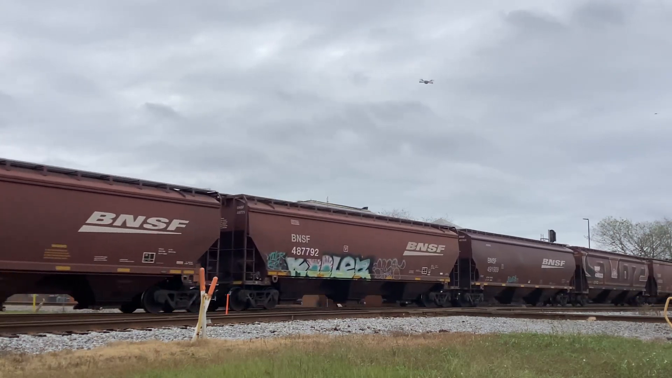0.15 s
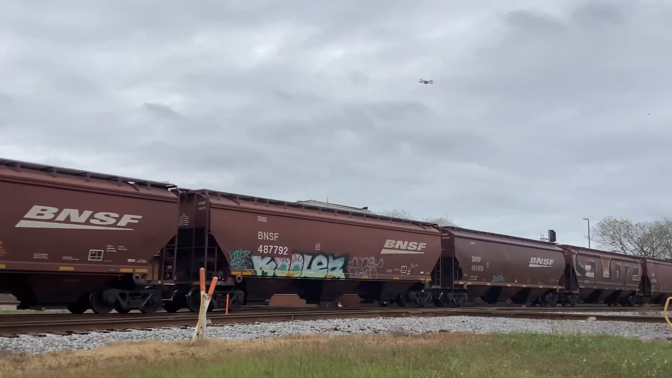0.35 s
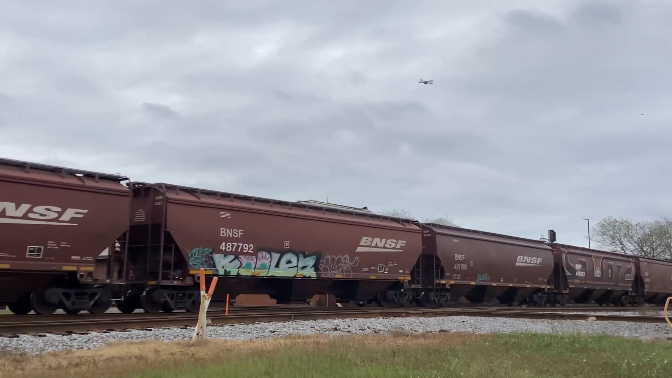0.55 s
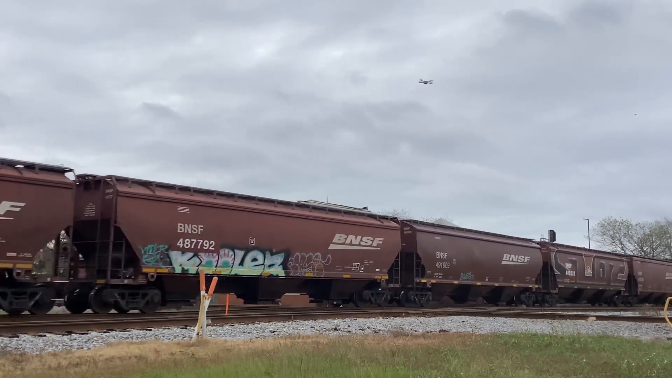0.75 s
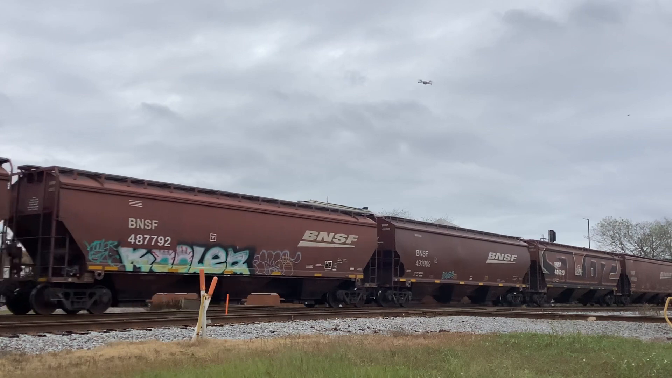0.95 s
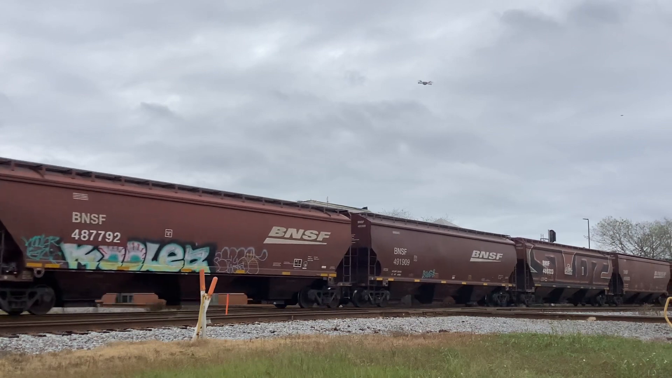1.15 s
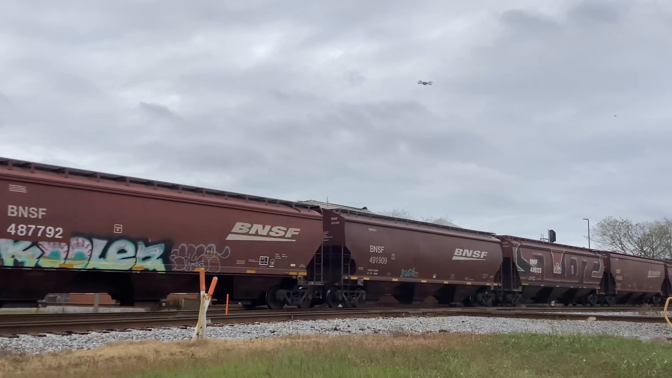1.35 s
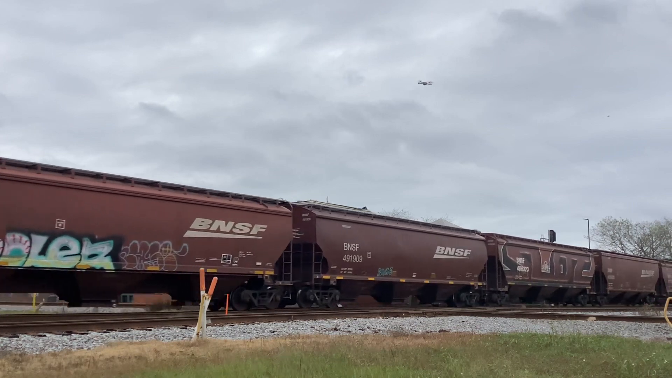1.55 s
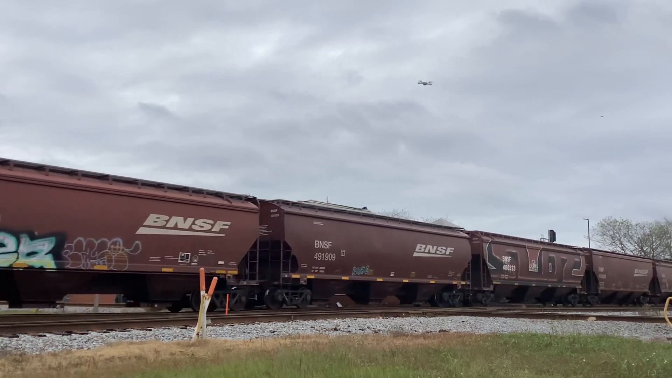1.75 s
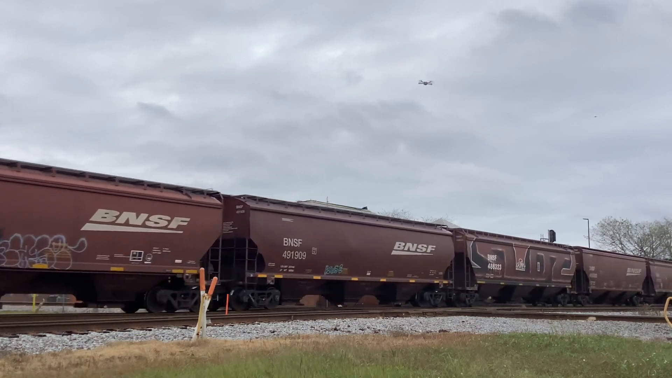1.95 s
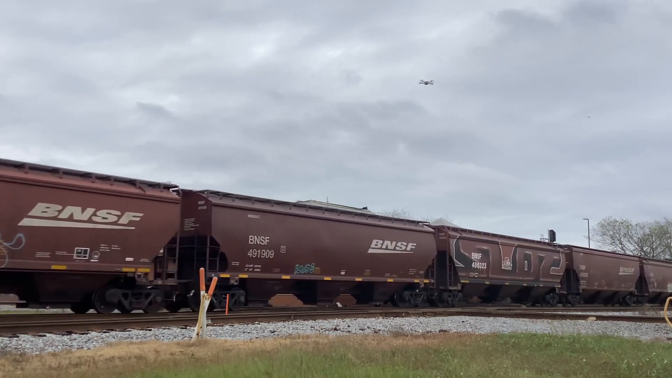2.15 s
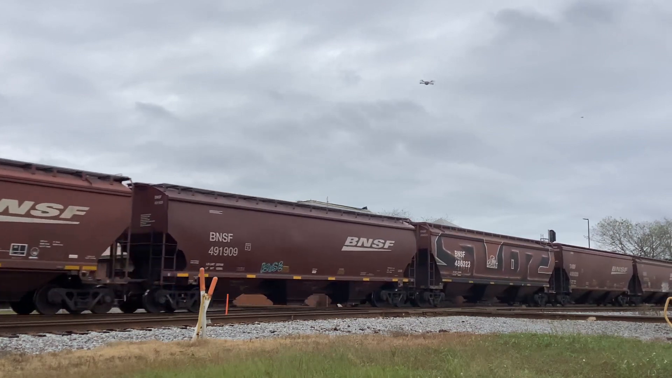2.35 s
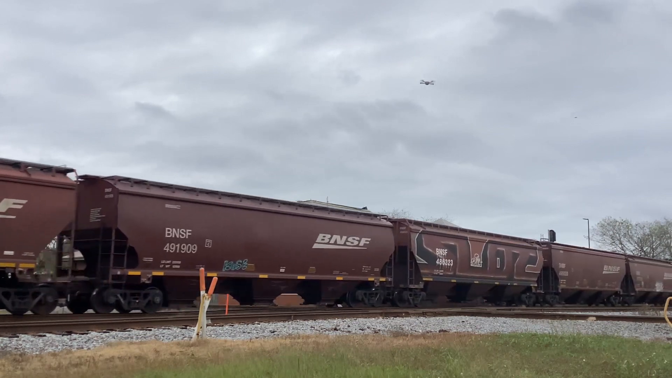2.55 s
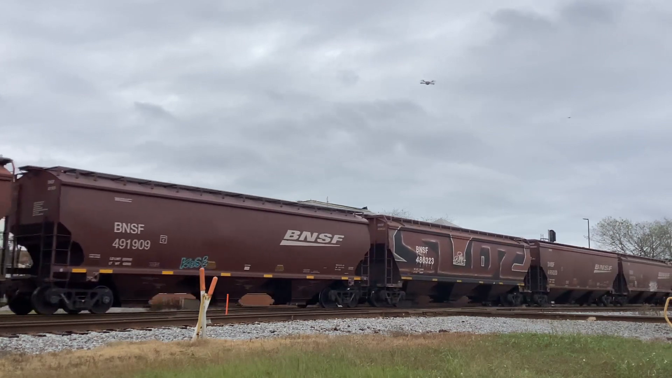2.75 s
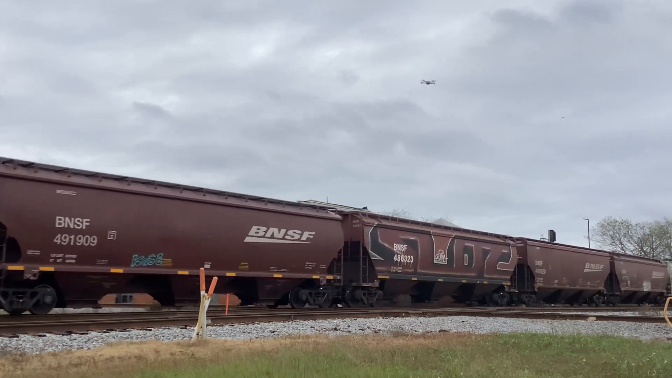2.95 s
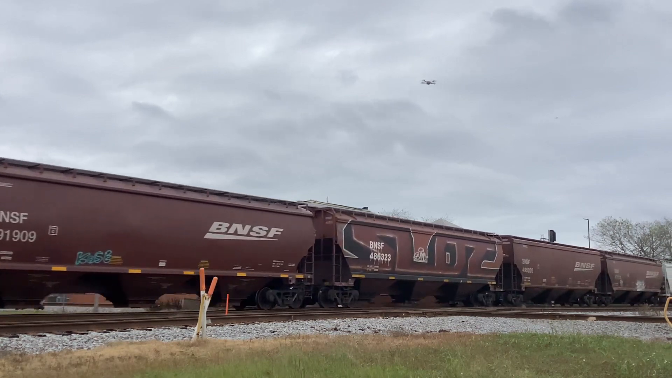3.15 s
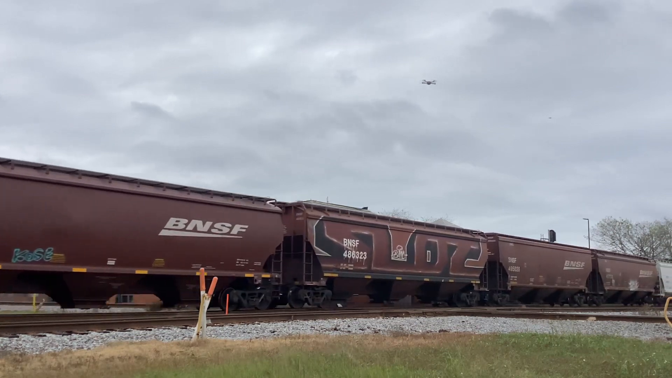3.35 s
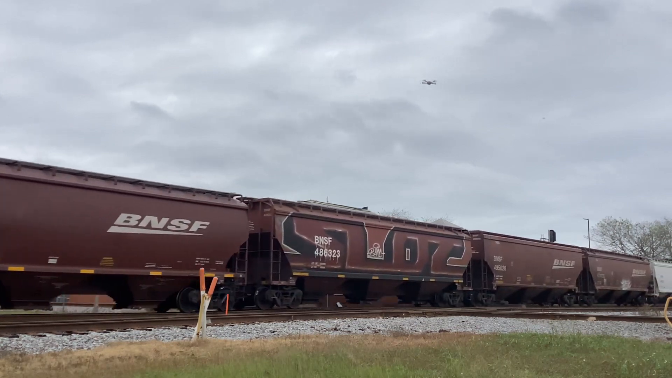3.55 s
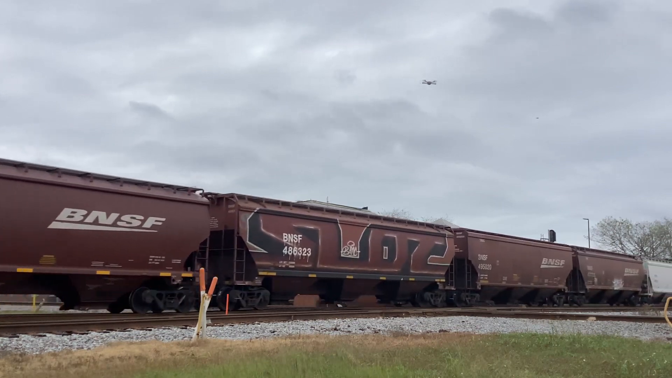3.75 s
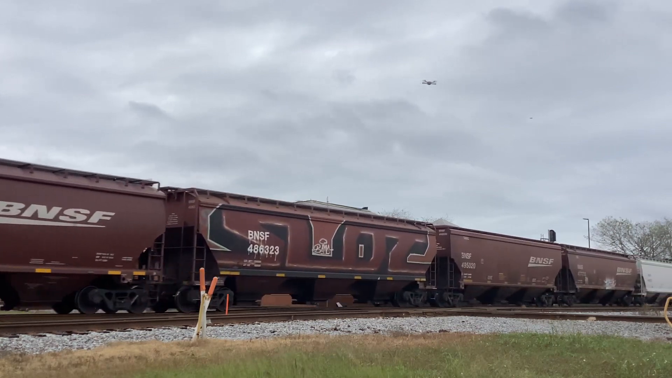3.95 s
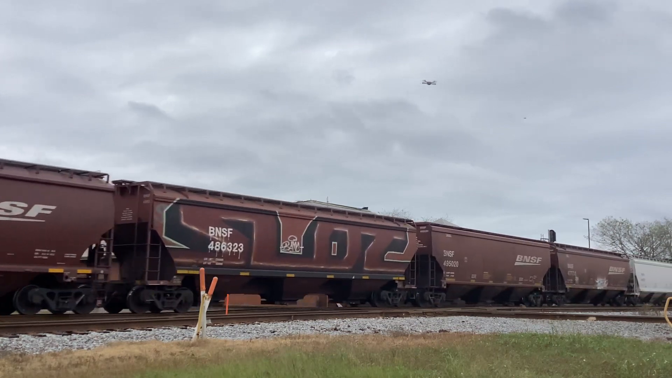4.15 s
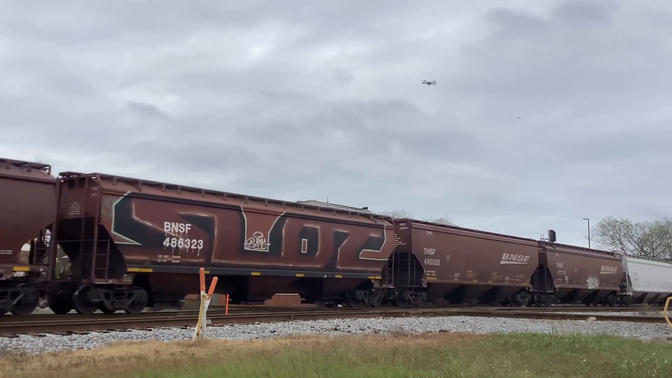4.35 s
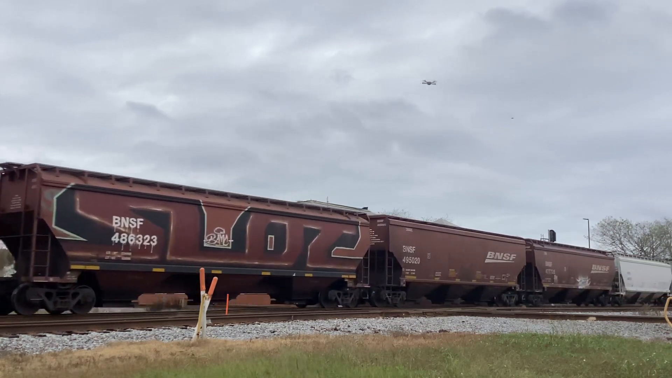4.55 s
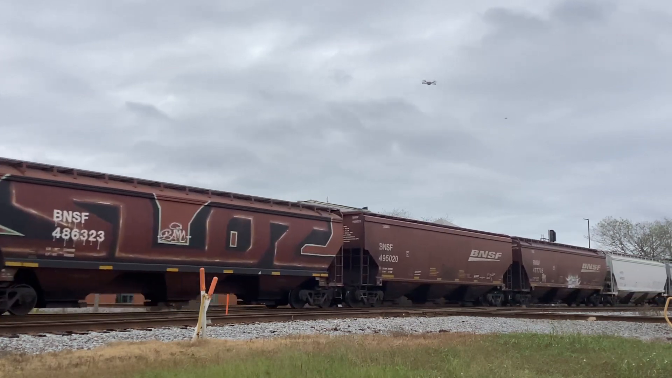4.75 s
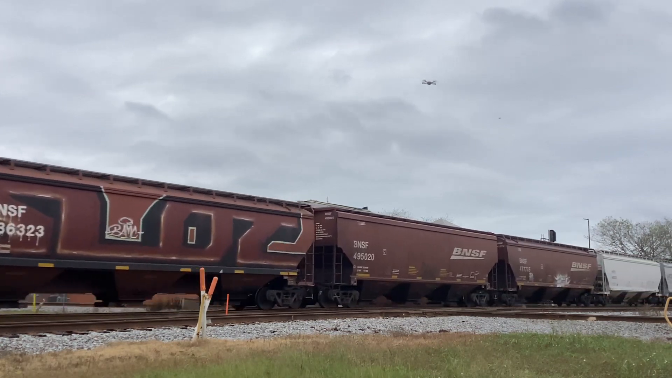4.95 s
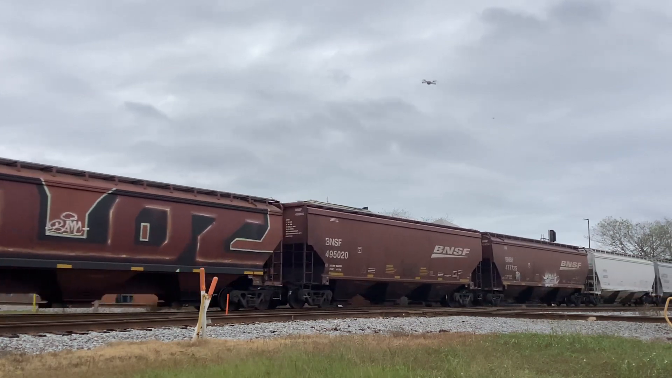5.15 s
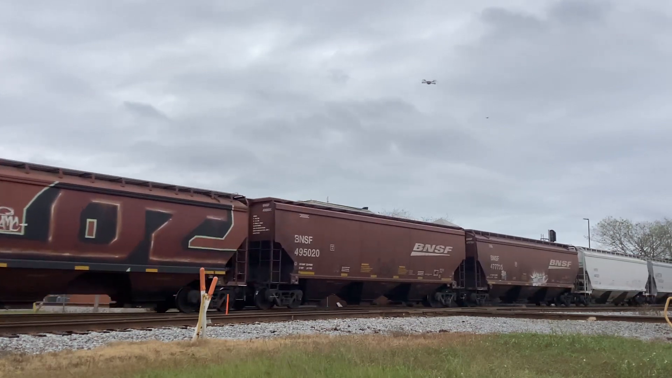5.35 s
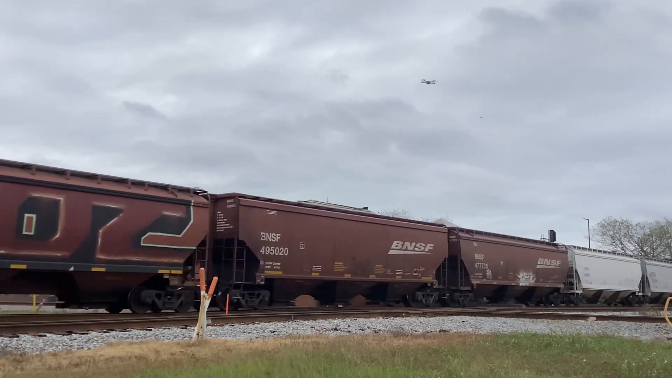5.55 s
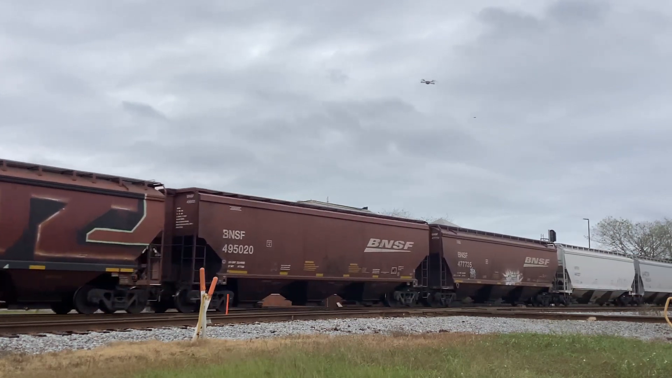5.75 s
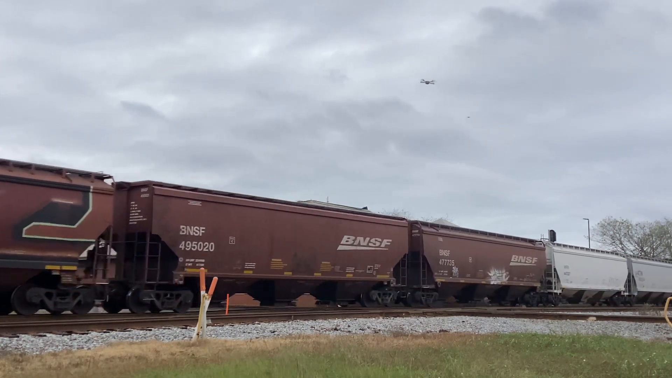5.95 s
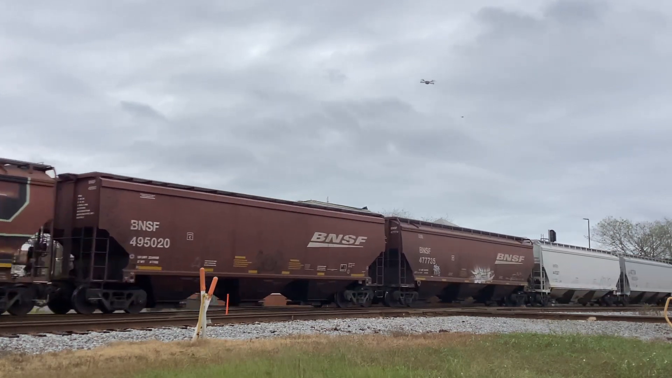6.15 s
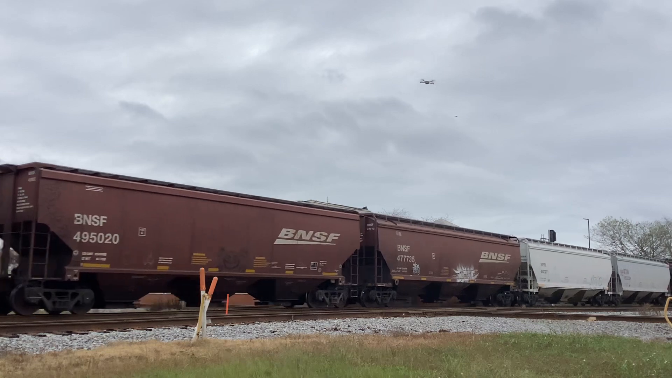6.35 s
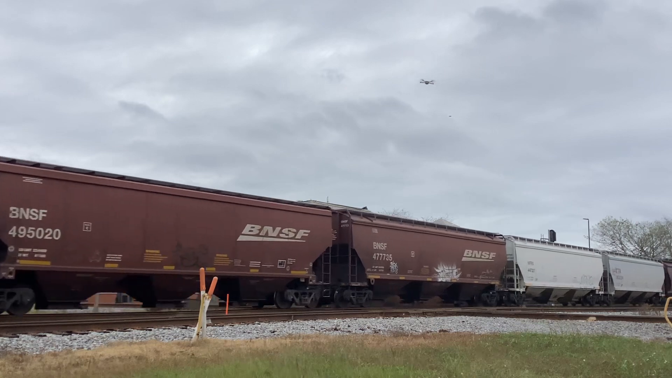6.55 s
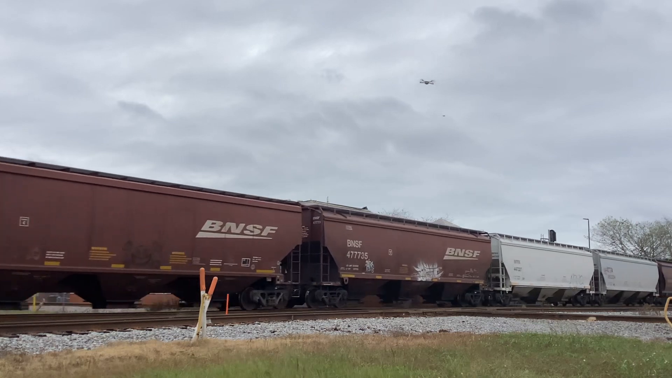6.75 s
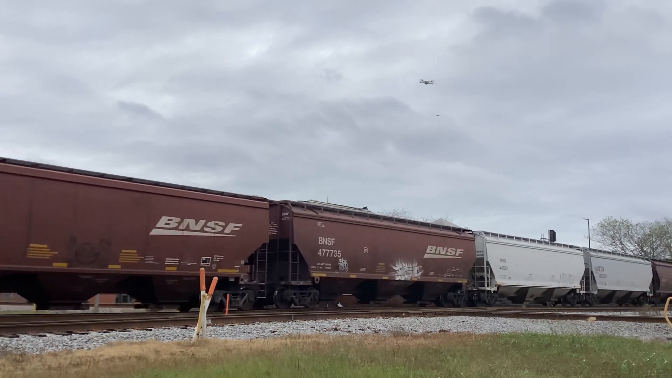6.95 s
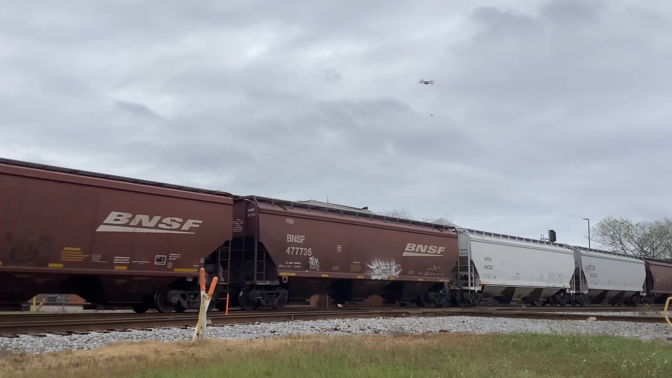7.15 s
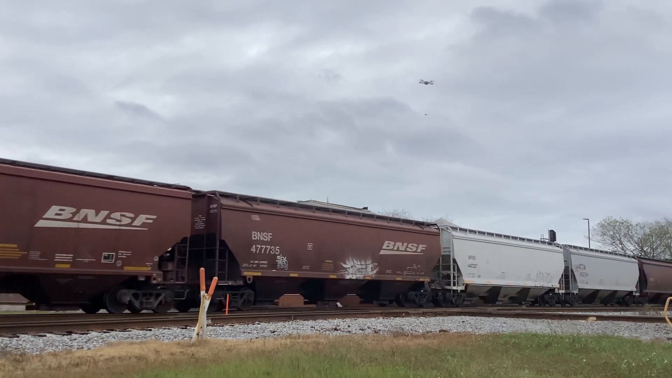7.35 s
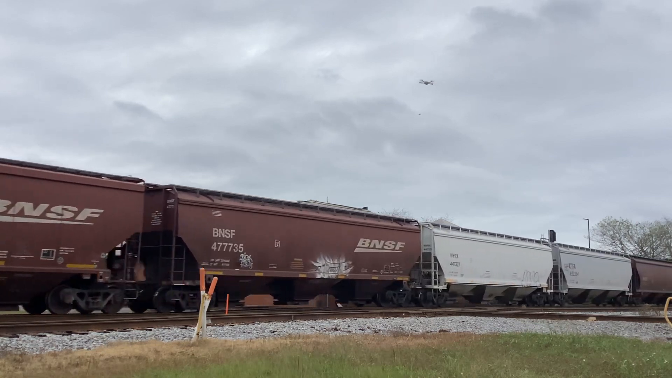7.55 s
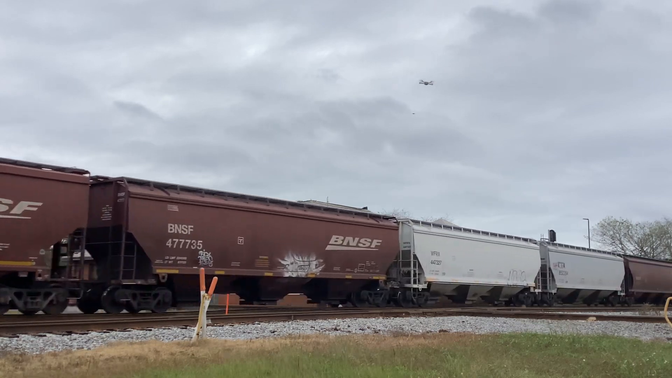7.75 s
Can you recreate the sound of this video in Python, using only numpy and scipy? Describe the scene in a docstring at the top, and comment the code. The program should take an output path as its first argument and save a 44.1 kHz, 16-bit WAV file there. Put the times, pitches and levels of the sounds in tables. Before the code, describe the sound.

Close beside the track, loaded-sounding steel wagons roll by steadily. Four clusters of rapid metallic bangs hit rail gaps, each with bright crashes, low hollow thuds and loose rattles, separated by duller rumbling stretches. Fitful high squeal and strong hiss mark the first seconds; later only brief scrapes and faint whistles remain. Outdoor, dry, centred sound with short echoes off wagons and ground, the train still passing at the end.

```python
"""Open country, beside a curve: covered hopper wagons roll past a few metres away.
At each coupling four axles bang over two rail gaps: shaped noise and damped modes make the steel clang,
sine swings, panel modes and low noise make the wagon body boom, uneven knocks make loose gear rattle.
Noise bands give wheel rumble, tread roar and flange hiss; flanges also whistle and scrape.
At first one wheel squeals: two wandering sines with rasping noise."""
import sys
import numpy as np
from scipy import signal
from scipy.io import wavfile

SR = 44100
rng = np.random.default_rng(int(sys.argv[2]) if len(sys.argv) > 2 else 0)


def transcribe(signal):
    """Save signal, clipped to [-1, 1], as a 16-bit WAV file at the path in sys.argv[1]."""
    frames = np.atleast_2d(signal).T
    limited = np.clip(frames, -1, 1)
    pcm = np.round(limited * 32767).astype(np.int16)
    wavfile.write(sys.argv[1], SR, pcm)


N = 343539
TIME = np.arange(N) / SR

# couplings, offsets to the blow pattern: (first blow [s], clang [dB], bright crash [dB], boom [dB],
# change of the rumble behind it [dB])
COUPLINGS = [(0.935, -1.16, 0.8, -0.5, 0), (2.680, 0.15, -0.4, -0.7, -1), (4.479, 0.8, -0.2, -0.9, 1.5),
             (6.193, 1, 1.7, 0, 2)]


def from_db(db):
    """Decibels to amplitude gain."""
    return 10 ** (np.asarray(db) / 20)


def rms_one(x):
    """Scale to unit rms."""
    return x / np.sqrt(np.mean(x ** 2) + 1e-20)


def in_time(rows):
    """Interpolate each column of a (time, ...) curve to every sample."""
    s, *columns = np.transpose(rows)
    return [np.interp(TIME, s, column) for column in columns]


def add(track, s, sound):
    """Mix a sound in at time s."""
    i = int(s * SR)
    track[i:i + len(sound)] += sound[:N - i]


def drift(rate_hz):
    """Smooth random curve with rms 1, changing about rate_hz times a second."""
    # computed at SR / 20, start-up discarded
    r = np.exp(-40 * np.pi * rate_hz / SR)
    white = rng.standard_normal(N // 20 + 4002)
    slow = signal.lfilter([1], [1, -2 * r, r * r], white)[4000:]
    return np.interp(np.arange(N) / 20, np.arange(len(slow)), rms_one(slow))


def swell(time, start, end):
    """Half a sine arch from start to end."""
    return np.abs(np.sin(np.pi * np.clip((time - start) / (end - start), 0, 1)))


def band(x, low_hz, high_hz, order=2):
    """Butterworth band-pass."""
    edges_hz = [low_hz, min(high_hz, SR / 2 - 500)]
    return signal.sosfilt(signal.butter(order, edges_hz, "band", fs=SR, output="sos"), x)


def noise(spectrum, flicker_db, count):
    """Noise bands following a spectrum, each flickering on its own; rms 1."""
    hz, db = np.transpose(spectrum)
    edges_hz = np.geomspace(hz[0], hz[-1], count + 1)
    # neighbouring bands use different noise
    white = rng.standard_normal((2, N))
    out = 0
    for k, (low_hz, high_hz) in enumerate(zip(edges_hz, edges_hz[1:])):
        level_db = np.interp(np.log(low_hz * high_hz) / 2, np.log(hz), db)
        gain = from_db(level_db + flicker_db * drift(14.0))
        out = out + band(white[k % 2], low_hz, high_hz) * gain
    return rms_one(out)


def resonance(x, hz, width_hz):
    """Damped two-pole resonance, peak gain about 1."""
    r = np.exp(-np.pi * width_hz / SR)
    numerator = np.array([1, 0, -1]) * (1 - r * r) / 2
    return signal.lfilter(numerator, [1, -2 * r * np.cos(2 * np.pi * hz / SR), r * r], x)


def hum_of(hz, width_hz, size=N):
    """Rough contact as white noise drives two equal resonances in series; rms 1."""
    # each is wider, since the pair is narrower than one
    once = resonance(rng.standard_normal(size), hz, 1.43 * width_hz)
    return rms_one(resonance(once, hz, 1.43 * width_hz))


def ring(clicks, hz, t60_s):
    """Damped mode: a unit click starts a decaying sine of height 1."""
    r, w = from_db(-60 / (t60_s * SR)), 2 * np.pi * hz / SR
    return signal.lfilter([0, np.sin(w)], [1, -2 * r * np.cos(w), r * r], clicks + 1e-18)


def blows(times_s, gains):
    """One click for each blow."""
    clicks = np.zeros(N)
    np.add.at(clicks, np.clip((times_s * SR).astype(int), 0, N - 1), gains)
    return clicks


def shaking(times_s, db, rise_s, t60_s, tail_db, tail_t60_s):
    """Vibration envelope: energy builds up, drops fast and lingers in a weaker tail."""
    energy = blows(times_s, from_db(db) ** 2) + 1e-18
    # -120 as amplitude dB is -60 dB of energy
    fast = signal.lfilter([1], [1, -from_db(-120 / (t60_s * SR))], energy)
    slow = signal.lfilter([1], [1, -from_db(-120 / (tail_t60_s * SR))], energy)
    r = np.exp(-1 / (rise_s * SR))
    return np.sqrt(signal.lfilter([1 - r], [1, -r], fast + from_db(tail_db) ** 2 * slow))


def rattle(shake, max_per_s, spread_db):
    """Loose gear chatters in uneven noise knocks, more often the harder it is shaken."""
    chance = max_per_s * np.sqrt(shake / shake.max()) / SR
    hit = rng.random(N) < chance
    knocks = hit * from_db(spread_db * rng.standard_normal(N).clip(-2, 2))
    age = TIME[:SR // 20]
    tap = band(rng.standard_normal(len(age)), 330, 6400, order=1) * np.exp(-age / 0.0025)
    darker_tap = signal.lfilter([1], [1, -.7], tap)
    return shake * rms_one(signal.fftconvolve(knocks, darker_tap)[:N])


def clacks():
    """Train speed sets the blow times: every axle strikes both gaps, no two blows alike."""
    # eight blows, axle by axle, first then second gap: (clang [dB], bright crash [dB], strongest ring [Hz],
    # boom [dB], boom pitch [Hz], boom lag [s]); levels and pitches before offsets and spread
    clack_pattern = [(-15, -17.5, 1640, -10.5, 140, .019), (-13.5, -16.5, 1400, -11, 160, 0.0181),
                     (-16.5, -20, 1800, -8.5, 157, 0.0166), (-15.5, -17.2, 2000, -8, 110, .025),
                     (-15, -17.5, 1750, -8.5, 149, .016), (-14, -17.5, 936, -10, 170, 0.0179),
                     (-16.1, -18, 1500, -9, 155.5, .020), (-15, -18, 1200, -13, 172, 0.014)]
    # travel times: within a bogie, bogie to bogie across the coupling, gap to gap
    wheelbase_s, bogie_to_bogie_s, gap_to_gap_s = .183, .397, .138
    blow_spread_db, ring_spread_octaves, boom_spread_octaves = 0.5, 0.19, 0.055
    spreads = blow_spread_db, ring_spread_octaves, boom_spread_octaves
    axles_s = np.array([0, wheelbase_s, bogie_to_bogie_s, bogie_to_bogie_s + wheelbase_s])
    delays_s = np.add.outer(axles_s, [0, gap_to_gap_s]).ravel()
    clang_db, crash_db, ring_hz, boom_db, boom_hz, lag_s = np.transpose(clack_pattern)
    bursts = []
    for s, more_clang_db, more_crash_db, more_boom_db, _ in COUPLINGS:
        force_db, ring_shift, boom_shift = (
            spread * rng.standard_normal(len(delays_s)).clip(-2, 2) for spread in spreads)
        bursts.append([
            s + delays_s,
            clang_db + more_clang_db + force_db,
            crash_db + more_crash_db + force_db,
            ring_hz * 2 ** ring_shift,
            boom_db + more_boom_db + force_db,
            boom_hz * 2 ** boom_shift,
            lag_s])
    return np.hstack(bursts)


def steel_clang(hits):
    """Each blow sets off a dense noise wash of steel modes, with a few standing out."""
    # relative spectra: (frequency [Hz], density [dB per Hz])
    clang_spectrum = [(200, -9.5), (290, 9), (400, 3), (700, 4), (1200, -2), (1800, 1), (2200, -4),
                      (2700, -8), (3400, -11.5), (5000, -35)]
    crash_spectrum = [(2500, 4.5), (3600, -5.5), (5100, 4), (6300, -0.5), (7800, 2), (8500, 0), (9000, -7),
                      (9600, 3.5), (11000, -2.5), (13000, -9), (15500, -30)]
    # wheel and rail resonances: (frequency [Hz], width [Hz], relative level [dB])
    steel_modes = [(1003, 140, -3.5), (1307, 190, -3.5), (1600, 64, -5.5), (1850, 260, -4),
                   (2510, 230, -6.5), (3980, 100, -12), (5030, 90, -17), (5160, 180, -11),
                   (9540, 340, -4.5)]
    s, clang_db, crash_db, ring_hz, *_ = hits
    # the wheel bounces on the rail: uneven clatter
    bounce = from_db(0.53 * drift(70))
    shake = bounce * shaking(s, clang_db, rise_s=.006, t60_s=0.21, tail_db=-7.5, tail_t60_s=0.74)
    bright = bounce * shaking(s, crash_db, rise_s=0.011, t60_s=0.28, tail_db=-1.5, tail_t60_s=0.92)
    # the rail end sags and grinds just before the wheel reaches the gap
    sag = sum(from_db(db - 9.5) * np.interp(TIME, [t - .07, t, t + 0.0081], [0, 1, 0])
              for t, db in zip(s, clang_db))
    wash = from_db(-2.5) * np.hypot(shake, sag) * noise(clang_spectrum, flicker_db=2.0, count=18)
    crash = from_db(-3.5) * bright * noise(crash_spectrum, flicker_db=1.7, count=26)
    ringing = shaking(s, clang_db, rise_s=0.013, t60_s=0.37, tail_db=-6.5, tail_t60_s=0.77)
    modes = ringing * rms_one(sum(from_db(db) * hum_of(hz, width) for hz, width, db in steel_modes))
    # where the wheel lands decides which resonance speaks loudest
    age, strongest = TIME[:SR // 5], np.zeros(N)
    envelope = (1 - np.exp(-age / 0.0059)) * np.exp(-age / 0.023)
    for t, db, hz in zip(s, clang_db, ring_hz):
        add(strongest, t, from_db(db - 6.0) * envelope * hum_of(hz, width_hz=64, size=len(age)))
    loose_gear = rattle(shake, max_per_s=130, spread_db=3)
    return wash + crash + strongest + from_db(-7.0) * modes + from_db(-15) * loose_gear


def knock(hits):
    """First contact strikes a few damped modes at once, each with a strength of its own."""
    # (frequency [Hz], relative level [dB], t60 [s])
    knock_modes = [(640, -2.5, 0.029), (1110, -8, 0.032), (1485, -2, 0.029), (1636, -2, 0.039),
                   (1960, -4, 0.031), (2790, -6, .02)]
    s, clang_db, *_ = hits
    chance = rng.standard_normal((len(s), len(knock_modes))).clip(-2, 2)
    out = 0
    for k, (hz, db, t60_s) in enumerate(knock_modes):
        gains = from_db(clang_db + db - 2.0 + 2.3 * chance[:, k])
        # alternating polarity
        out = out + (-1) ** k * ring(blows(s + 0.002754, gains), hz, t60_s)
    return out


def crack(hits):
    """Steel meets steel: a very bright noise burst, quick to rise, with only a faint tail."""
    # relative spectrum: (frequency [Hz], density [dB per Hz])
    crack_spectrum = [(900, -14), (1600, 21), (3400, -18), (5200, -10), (10000, 11), (12500, -2),
                      (14000, -6), (15600, -16)]
    s, _, crash_db, *_ = hits
    burst = shaking(s, crash_db, rise_s=0.0039, t60_s=0.31, tail_db=-20, tail_t60_s=.3)
    return from_db(-11) * burst * noise(crack_spectrum, flicker_db=5.0, count=10)


def swing(hz, length_s):
    """A few heavy swings of the wagon body: an arched sine with an overtone."""
    age = TIME[:int(length_s * SR)]
    turns = hz * age + rng.random()
    overtone = from_db(-15.0) * np.sin(2 * np.pi * (1.94 * hz * age + rng.random()))
    return swell(age, 0, length_s) ** 2 * (np.sin(2 * np.pi * turns) + overtone)


def body_boom(hits):
    """The jolt passes the springs a moment later: the hollow body swings, then drones on."""
    # relative spectrum: (frequency [Hz], density [dB per Hz])
    boom_spectrum = [(30, -32), (45, -42), (65, -7.5), (125, -8), (170, -6.5), (230, -11), (350, -48)]
    # hollow body: (frequency [Hz], relative level [dB], t60 [s])
    body_modes = [(78.6, 0.5, 0.27), (103, 1.5, 0.28), (120.6, -4, 0.52), (165, -1.5, 0.11),
                  (282, 7.5, 0.04)]
    # dull bumps of a wagon on its springs: (centre time [s], relative level [dB], frequency [Hz])
    bumps = [(0.024, -16.5, 87), (1.854, -36, 152), (2.67, -16, 144), (3.319, -10, 125), (5.121, -9, 126),
             (5.237, -7.5, 113), (5.497, -21, 101)]
    s, *_, boom_db, boom_hz, lag_s = hits
    chance = rng.standard_normal((len(s), 2, len(body_modes)))
    length_s, swings = .036, np.zeros(N)
    for t, db, hz in [*zip(s + lag_s, boom_db, boom_hz), *bumps]:
        add(swings, t - length_s / 2, from_db(db) * swing(hz, length_s))
    panels = 0
    for k, (hz, db, t60_s) in enumerate(body_modes):
        times_s = s + lag_s + 0.0037 * chance[:, 0, k].clip(-1, 1)
        gains = from_db(boom_db + db + 2 * chance[:, 1, k])
        panels = panels + ring(blows(times_s, gains), hz, t60_s)
    envelope = shaking(s, boom_db, rise_s=0.003, t60_s=0.22, tail_db=-3.0, tail_t60_s=0.88)
    drone = envelope * noise(boom_spectrum, flicker_db=2.4, count=10)
    return from_db(-2.5) * swings + from_db(-11.0) * band(panels, 75, 390) + from_db(-9.0) * drone


def trackside(x):
    """Adds dull, delayed echoes from wagon sides and ground."""
    # (delay [s], level [dB])
    echoes = [(.011, -16.5), (.027, -12.5), (.058, -21), (.104, -15)]
    dull = band(x, 220, 5000, order=1)
    return x + sum(from_db(db) * np.interp(TIME - s, TIME, dull, left=0) for s, db in echoes)


def fits_of_squeal():
    """Stick-slip fits build up, hold and die away; gains of low mode, high mode and rasp."""
    # (time [s], length [s], low mode [dB], high mode [dB], rasp beside the low mode [dB])
    squeal_fits = [(-.03, 0.085, -32, -27, -32), (.06, 0.11, -24.5, -28, -31), (.19, .04, -34, -29, -29),
                   (0.295, 0.24, -27.5, -25.5, -32), (0.568, 0.25, -25.5, -32.5, -34.5),
                   (.87, 0.14, -46, -33, -35), (1.2, 0.59, -40, -46, -39), (1.82, .30, -28.5, -75, -35),
                   (2.202, .09, -48, -55, -32), (2.346, 0.23, -41, -60, -36)]
    attack_s, release_s = 0.023, 0.065
    power = 0
    for s, length_s, *db in squeal_fits:
        attack = np.clip((TIME - s) / attack_s, 0, 1)
        release = np.exp(-np.maximum(TIME - s - length_s, 0) / release_s)
        power = power + np.outer(from_db(db), attack * release + 1e-9) ** 2
    return np.sqrt(power)


def wheel_tone(hz, wander_hz, flutter_db):
    """A wheel mode kept going by stick and slip: a sine unsteady in pitch and strength; rms 1."""
    phase = 2 * np.pi * np.cumsum(hz + wander_hz * drift(45)) / SR
    return rms_one(np.sin(phase) * from_db(flutter_db * drift(60)))


def squeal():
    """Two wheel modes sing, each with a rasping noise skirt from irregular slip."""
    # pitch sinks as the wheel draws level: (time [s], low mode [Hz], high mode [Hz])
    squeal_pitch = [(0, 3240, 7688), (.4, 3236, 7668), (.8, 3231, 7660), (1.9, 3225, 7650),
                    (2.7, 3226, 7645)]
    low_gain, high_gain, rasp_gain = fits_of_squeal()
    low_hz, high_hz = in_time(squeal_pitch)
    white = rng.standard_normal(N)
    low = wheel_tone(low_hz, wander_hz=3.3, flutter_db=0.9)
    rasp = from_db(0.1) * rms_one(band(white, 3165, 3373, order=3))
    high_skirt = from_db(-6) * rms_one(band(white, 7670, 7770))
    high = wheel_tone(high_hz, wander_hz=9.8, flutter_db=0.3) + high_skirt
    return low_gain * low + rasp_gain * rasp + high_gain * high


def rolling():
    """Rough treads rumble and roar on the rail; flanges rub its side with a high hiss."""
    # before fixed offsets: (time [s], tread roar [dB], flange hiss [dB]), in groups
    rolling_levels = [
        [(0.0, -40, -26.5), (0.484, -40, -27), (0.88, -42.5, -28.5)],
        [(1.92, -40, -35), (2.358, -42, -33.5), (2.6, -42, -38.5)],
        [(3.68, -41, -36.5), (4.328, -43, -42.5), (4.42, -41, -36)],
        [(5.45, -37.5, -35.5), (5.994, -41, -38.5), (6.03, -40, -38)],
        [(7.17, -40.5, -37.5), (7.55, -38.5, -38.5), (7.79, -40.5, -36)],
    ]
    # relative spectra: (frequency [Hz], density [dB per Hz])
    rumble_spectrum = [(25, -42), (38, -94), (55, -11), (85, 3), (140, -5.5), (190, -4.5), (260, -15),
                       (420, -21.5)]
    roar_spectrum = [(250, -2.5), (420, -1), (950, 1.5), (1500, 0), (2200, -4.5), (3500, -8), (5000, -6.5),
                     (6300, -12), (8500, -9.5), (13000, -51)]
    hiss_spectrum = [(5500, -21), (7000, -9.5), (8700, -8), (9700, 3), (10800, -1), (12000, -8.5),
                     (13500, -16.5), (15500, -26)]
    # steady rumble, changed by a few dB after some couplings:
    # slightly weaker after the second, stronger after the last two
    rumble_db, change_lag_s, change_width_s = -30, 1.13, 0.33
    roar_db, hiss_db = in_time(np.vstack(rolling_levels))
    change_db = sum(db * np.exp(-((TIME - s - change_lag_s) / change_width_s) ** 2)
                    for s, *_, db in COUPLINGS)
    rumble = from_db(rumble_db + change_db) * noise(rumble_spectrum, flicker_db=2.34, count=12)
    tread = from_db(roar_db + 6.5 + 0.56 * drift(7.5))
    grit = rattle(tread, max_per_s=45, spread_db=3.5)
    roar = tread * noise(roar_spectrum, flicker_db=2.1, count=22) + from_db(-13) * grit
    hiss_gain = from_db(hiss_db + 1.2 + 0.5 * drift(10))
    hiss = hiss_gain * noise(hiss_spectrum, flicker_db=2.0, count=20)
    return rumble + roar + hiss


def whistles():
    """Flanges touch the rail for a moment: some whistle as sines, some scrape as resonant noise."""
    # thin tones: (time [s], length [s], frequency [Hz], relative level [dB])
    whistle_tones = [(0, 1.3, 12725, -46), (.45, .25, 12715, -41), (.55, .35, 13790, -49),
                     (1.8, .45, 11003, -46), (1.86, .2, 13320, -44), (2.0, .05, 13320, -35),
                     (3.45, .65, 5010, -51), (4.1, .38, 7616, -50), (5.4, .7, 3228, -52)]
    # short rubs: (time [s], length [s], frequency [Hz], width [Hz], level [dB])
    scrapes = [(0, 0.67, 13000, 2000, -36), (0.257, 0.23, 880, 150, -37), (.33, 0.079, 5950, 5000, -32),
               (0.467, .15, 1230, 160, -37.5), (1.0, 1, 10100, 2000, -29.5), (1.95, 0.73, 11300, 900, -40),
               (3.6, 0.23, 5000, 2500, -37.5), (5.624, 0.16, 4470, 4020, -32),
               (6.03, 0.22, 9300, 4000, -28.5), (6.052, 0.24, 1300, 2500, -30), (7.44, .2, 4470, 4000, -38)]
    tones, rubs = 0, 0
    for s, length_s, hz, db in whistle_tones:
        tone = wheel_tone(hz, wander_hz=26, flutter_db=3)
        tones = tones + from_db(db) * np.sqrt(swell(TIME, s, s + length_s)) * tone
    for s, length_s, hz, width_hz, db in scrapes:
        rubs = rubs + from_db(db) * swell(TIME, s, s + length_s) * hum_of(hz, width_hz)
    return from_db(5.0) * tones + rubs


def scene():
    """The train, heard alike in both channels; only clang and knock echo."""
    hits = clacks()
    impacts = trackside(steel_clang(hits) + knock(hits)) + crack(hits) + body_boom(hits)
    train = impacts + rolling() + squeal() + whistles()
    return np.array([train, train])


def record(dry):
    """The microphone sheds the deepest bass, the highest peaks are rounded, the top is cut."""
    cutoff_hz = 15750
    thin = signal.sosfilt(signal.butter(4, 42, "high", fs=SR, output="sos"), dry)
    rounded = thin / (1 + (np.abs(thin) / .95) ** 6) ** (1 / 6)
    return signal.sosfilt(signal.ellip(10, .2, 80, cutoff_hz, fs=SR, output="sos"), rounded)


dry = scene()
out = record(dry)
transcribe(out)
```